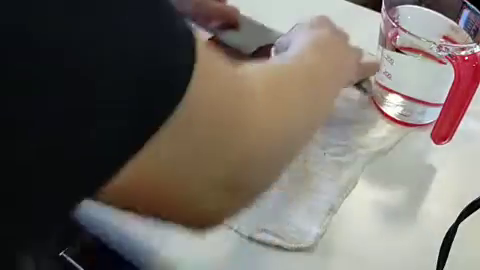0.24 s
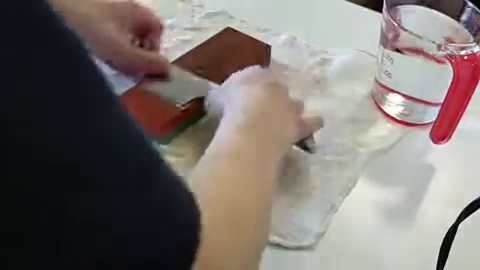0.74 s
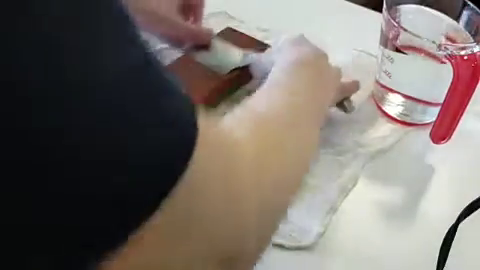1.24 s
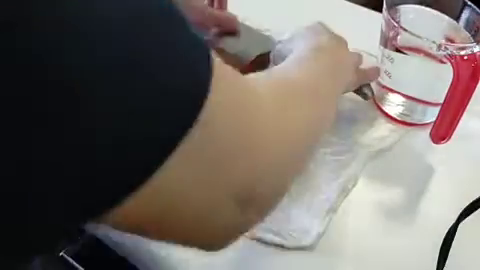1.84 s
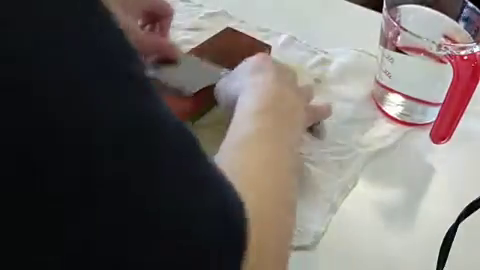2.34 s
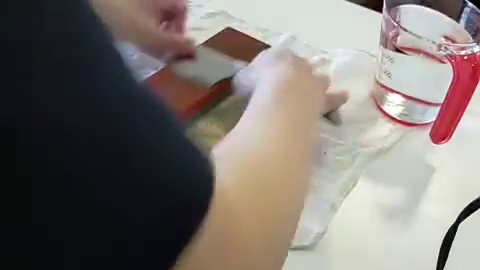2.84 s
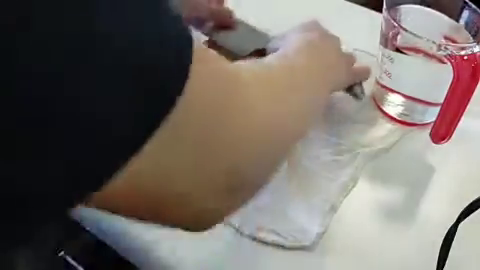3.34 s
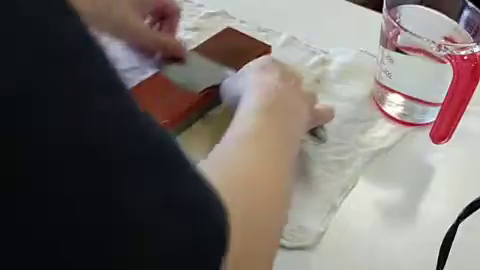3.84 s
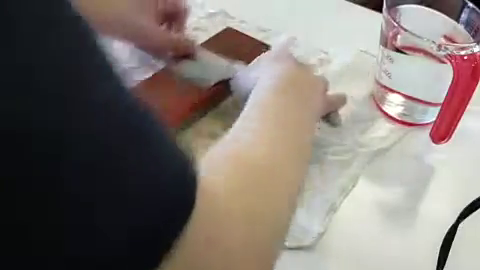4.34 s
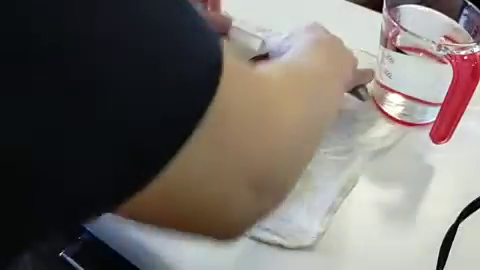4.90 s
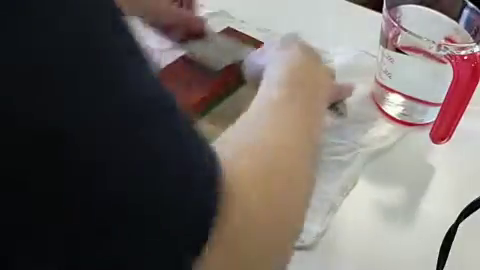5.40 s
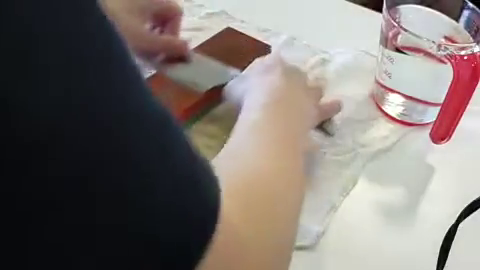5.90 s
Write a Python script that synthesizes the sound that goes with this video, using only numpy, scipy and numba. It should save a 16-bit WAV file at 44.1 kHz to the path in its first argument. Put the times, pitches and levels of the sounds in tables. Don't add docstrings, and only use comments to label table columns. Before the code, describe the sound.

Close, thin-sounding knife sharpening in a small indoor room: a knock of steel on stone, a rough metallic scrape with wavering high ring and sandy hiss, a quick flick, then a brief gap of faint room air. Eight regular strokes follow the end of an earlier one. Most surge towards the lift; the seventh stalls, then jerks onward with a low rumble. A few small clicks stray among them.

```python
import sys
import numpy as np
from scipy import signal
from scipy.fft import rfft, irfft, next_fast_len
from scipy.io import wavfile
from scipy.ndimage import uniform_filter1d
from numba import njit

SR = 44100
rng = np.random.default_rng(int(sys.argv[2]) if len(sys.argv) > 2 else 0)


def wav_record(signal):
    frames = np.transpose(np.atleast_2d(signal))
    bounded = np.clip(frames, -1, 1)
    quanta = np.round(bounded * 32767).astype(np.int16)
    wavfile.write(sys.argv[1], SR, quanta)


def rack_gain(trim_db):
    fader = np.asarray(trim_db, float)
    return 10 ** (fader / 20)


N = 271656

# time in seconds, ring level in dB.
PRESSURES = [
    [(0.405, -48), (0.433, -47), (0.441, -34.5), (0.689, -34.5), (0.787, -23.5), (0.825, -41), (0.832, -48)],
    [(1.15, -55), (1.16, -61), (1.246, -32.5), (1.404, -38.5), (1.414, -32.5), (1.55, -28.5), (1.582, -40)],
    [(1.91, -49.5), (1.996, -25.5), (2.042, -35), (2.046, -32), (2.27, -28.5), (2.356, -27.5), (2.385, -65)],
    [(2.675, -50), (2.697, -52), (2.757, -26.5), (2.895, -25.5), (2.899, -32), (3.075, -22), (3.11, -42)],
    [(3.405, -61), (3.427, -65), (3.503, -28), (3.677, -31.5), (3.701, -24), (3.817, -29), (3.84, -52)],
    [(4.17, -65), (4.194, -59), (4.232, -29.5), (4.336, -29), (4.35, -36.5), (4.568, -25), (4.605, -43)],
    [(4.95, -23), (4.962, -42), (5.02, -29), (5.06, -35.5), (5.188, -40)],
    [(5.69, -44), (5.76, -33), (5.81, -31.5), (5.87, -30.5), (6.03, -31), (6.09, -26.5), (6.108, -35)],
]
# time in seconds, hiss level in dB.
SPEEDS = [
    [(0.405, -44), (0.443, -46), (0.625, -41.5), (0.745, -32.5), (0.759, -41), (0.811, -30.5), (0.832, -58)],
    [(1.15, -55.5), (1.234, -35), (1.258, -41.5), (1.384, -43), (1.426, -32), (1.548, -33), (1.582, -58)],
    [(1.91, -67), (1.958, -35.5), (2.004, -26.5), (2.03, -34.5), (2.172, -39.5), (2.342, -34.5),
     (2.385, -58)],
    [(2.675, -56), (2.699, -50), (2.765, -31), (2.913, -43), (2.935, -33.5), (3.065, -35), (3.11, -45)],
    [(3.405, -75), (3.423, -65), (3.493, -33), (3.619, -41.5), (3.745, -30), (3.809, -39.5), (3.84, -48)],
    [(4.17, -88), (4.222, -39.5), (4.254, -35.5), (4.354, -43.5), (4.53, -32.5), (4.576, -34.5),
     (4.605, -55)],
    [(4.95, -29), (4.958, -46), (5.022, -38.5), (5.084, -45), (5.188, -42.5)],
    [(5.69, -48), (5.716, -53), (5.746, -31.5), (5.77, -31.5), (5.916, -42), (6.036, -37.5), (6.108, -38.5)],
]
# time in seconds, ring level in dB, hiss level in dB.
JERKS = [
    [(0.0, -25.5, -36), (.03, -32.5, -36), (.07, -49, -60)],
    [(5.19, -46, -48), (5.197, -39.5, -36), (5.26, -26.5, -33.5), (5.336, -37, -36), (5.39, -64, -64)],
]
# start in seconds, length in seconds, ring level in dB,
# hiss level in dB, upper mode in Hz.
FLICKS = [
    (0.071, .04, -30.5, -38, 3686),
    (0.833, 0.031, -24.5, -34, 3620),
    (1.582, 0.039, -26.5, -33, 3740),
    (3.111, 0.027, -25, -36.5, 3570),
    (3.843, 0.069, -21, -30.5, 3673),
    (4.609, 0.038, -30, -34, 3670),
    (6.109, 0.048, -38, -45, 3540),
]
# second mode in Hz, third mode in Hz, upper over lower mode while loose in dB,
# time the edge bites in seconds, low mode level in dB.
GRIPS = [
    (1953, 2780, 14, .485, -1),
    (1970, 2800, 8, 1.24, -2),
    (2070, 2910, 8, 1.955, 2),
    (2010, 2850, 8, 2.74, 1.5),
    (1940, 2770, 3, 3.51, 1.5),
    (1975, 2800, 10, 4.25, -.6),
    (1984, 2940, 11, 5.04, -2.5),
    (2220, 2910, 4, 5.725, 4),
]
# time in seconds, upper over lower mode then in dB, the same at the lift in dB,
# upper mode then in Hz, upper mode at the lift in Hz.
BEDDINGS = [
    (.49, -1.5, 13.5, 3560, 3760),
    (1.25, 0, 9.6, 3500, 4000),
    (2.15, 1, 10, 3463, 3735),
    (2.89, -8, 23, 3480, 3600),
    (3.58, 0.5, 14, 3460, 3740),
    (4.3, -4, 18.4, 3530, 3720),
    (5.1, 7, 8, 3610, 3680),
    (5.81, -3, 12, 3450, 3720),
]
# start in seconds, length in seconds, rumble level in dB.
SHOVES = [
    (0.726, .06, -36),
    (1.456, .11, -32),
    (2.258, .04, -46),
    (4.501, 0.04, -44),
    (5.188, .16, -31),
    (6.045, 0.076, -51),
]
# time in seconds, thud level in dB, steel level in dB, bright steel level in dB.
LANDINGS = [
    (0.389, -12.5, -31, -31),
    (1.135, -16.5, -37.5, -45),
    (1.891, -14, -25, -46.5),
    (2.658, -12.5, -27, -31.5),
    (3.389, -17.5, -41, -37.5),
    (4.151, -18.5, -41, -44.5),
    (4.934, -12, -23.5, -30.5),
    (5.672, -12.5, -24.5, -30.5),
]
# time in seconds, peak level in dB, pitch in Hz.
TICKS = [
    (0.7782, -16, 3750),
    (1.8667, -31, 3750),
    (3.447, -37, 4550),
    (4.2136, -33, 3940),
    (4.474, -21, 3760),
    (4.7633, -28.5, 3430),
    (5.1943, -16, 3540),
]
# frequency in Hz, level in dB, T60 in seconds.
BLADE = [(1276, -4, .075), (1972, -2, .055), (2845, -3, .055), (3712, 1, .05), (3982, -8, .05),
         (4570, -5, .07), (5620, -9, .07), (6570, -6, .05), (7200, -1, .015), (8340, -5, .015),
         (9010, -12, .05), (10400, -12, .02)]
# frequency in Hz, level in dB, T60 in seconds.
TABLE = [(143, -1, 0.025), (231, -23, 0.48), (299.4, 14.5, 0.07), (338, -19, 0.27), (569, 4, 0.035),
         (617, -9, 0.028), (856, -34.5, 0.14)]
# frequency in Hz, level in dB per Hz.
HISS = [(2530, -75), (4300, -2), (5270, -11), (5580, 0), (6140, -3.5), (8400, -4), (9370, -7),
        (13700, -16.5), (14700, -24), (15000, -69)]
# frequency in Hz, level in dB per Hz.
AIR = [(15, -50), (25, -15), (154, 0), (202, 0.5), (335, -7), (475, -3), (529, -9), (903, -12), (1030, -14),
       (1670, -19), (2130, -22.5), (2430, -21), (4750, -23.5), (13800, -33.5), (15000, -75)]

FIRST_HZ, SECOND_HZ, THIRD_HZ, FOURTH_HZ = 1276, 1972, 2845, 3712
FIRST_RISE_S, FIRST_TOP_HZ, FIRST_LIFT_HZ = 0.2, 1566, 1450
LOOSE_LEAN_DB, LOOSE_UPPER_HZ, BEDDED_LOWER_HZ, LIFT_LOWER_HZ = 2, 3824, 2974, 3037
BED_IN_S, BITE_TURN_S = 0.055, 0.025
BITE_LOWER_HZ, BITE_SAG = 3025, 2
FLICK_RISE_S, FLICK_FALL_S, FLICK_SWELL_DB_PER_S, FLICK_EDGE_DB, FLICK_LEAN_DB = 0.012, 0.012, 102, 29, 10
LOW_DB, LOW_FOLLOWS, LOW_SAG_DB_PER_S = -40.5, 0.46, 24.5
RUMBLE_DB, RUMBLE_FOLLOWS, SETTLE_DB, SETTLE_S = -47.5, 0.11, 8, 0.066
SHOVE_EDGE_S, SHOVE_SAG_DB = 0.0085, 2.5
ROOM_T60_S, WALL_CUT_HZ, ROOM_DB, AIR_DB = 0.39, 21000, -24.5, -51.5
MIC_LOW_HZ, MIC_HIGH_HZ = 175, 14460


def scrape():
    press_db, hiss_db = effort(PRESSURES, column=2), effort(SPEEDS, column=3)
    upper_db, upper_hz, lower_db, lower_hz, first_hz = strong_modes(press_db)
    loose = np.exp(-(since_latest([row[0] for row in LANDINGS]) / 0.17) ** 2)
    grains = grit(per_s=7400.0, spread_db=2.5, clump_db=1.5)
    upper = cluster(grains, upper_hz, spacing_hz=161.5, width_hz=118, loose=0.86 * loose)
    lower = cluster(grains, lower_hz, spacing_hz=144, width_hz=136, loose=0.75 * loose)
    modes = weak_modes(grains, first_hz)
    broad = moving_mode(grains, np.full(N, 1900.0), width_hz=1000)
    low = rms_one(modes[0] + modes[1]) + rack_gain(7.5 - 14.5 * loose) * broad
    low = signal.sosfilt(signal.butter(4, 1150, "high", fs=SR, output="sos"), low)
    hiss = patchy_hiss(grains) + rack_gain(-11 + 9 * loose) * rms_one(sum(modes[5:]))
    low_db, rumble_gain = low_levels(hiss_db)
    rumble, rocking = stone_and_table()
    steel = rack_gain(upper_db) * upper - rack_gain(lower_db) * lower
    steel = steel + rack_gain(hiss_db + 2.0) * rms_one(hiss) + rack_gain(low_db - 1.0) * rms_one(low)
    return contact() * (steel + rumble_gain * rumble + shove_gain() * rocking)


def grit(per_s, spread_db, clump_db):
    sizes = rack_gain(spread_db * np.minimum(rng.exponential(1, N), 5)) * rng.choice([-1, 1], N)
    hits = rng.random(N) < per_s / SR
    return rms_one(sizes * hits * rack_gain(clump_db * drift(270.0)))


def cluster(grains, hz, spacing_hz, width_hz, loose):
    out = moving_mode(grains, hz, width_hz) * rack_gain(0.65 * drift(12.0))
    for side in (-3, -2, -1, 1, 2, 3):
        near_hz = hz + spacing_hz * (side + 0.35 * drift(1.4))
        near = moving_mode(grains, near_hz, width_hz * 1.07)
        flare = rack_gain(1.5 - 4.5 * abs(side) + 2.4 * drift(39.0))
        out += (1 - loose) * near * (-1) ** side * flare
    return rms_one(out)


def weak_modes(grains, first_hz):
    slide = uniform_filter1d(first_hz, size=1500) / FIRST_HZ
    modes = []
    for hz, level_db, t60_s in BLADE:
        mode_hz = hz * slide ** (FIRST_HZ / hz) ** 0.7
        mode = moving_mode(grains, mode_hz, width_hz=45 + hz * 0.008)
        modes.append(mode * rack_gain(level_db * 0.4 + 3.5 * drift(14.0)))
    return modes


def patchy_hiss(grains):
    bright, edges_hz = coloured(grains, HISS), np.geomspace(3000, 16000, 9)
    hiss = 0
    for k, band_hz in enumerate(zip(edges_hz, edges_hz[1:])):
        band = signal.sosfilt(signal.butter(2, band_hz, "band", fs=SR, output="sos"), bright)
        hiss = hiss + (-1) ** k * band * rack_gain(3.4 * drift(11.0))
    return rms_one(hiss)


def stone_and_table():
    jolts = grit(per_s=500.0, spread_db=1.5, clump_db=-0.5)
    rumble = sum(rms_one(ring(jolts, hz, t60_s * 0.49)) * rack_gain(level_db * 0.42) for hz, level_db, t60_s in TABLE)
    rock = ring(jolts, 282, 0.047) - ring(jolts, 305, 0.055) + rack_gain(-6) * ring(jolts, 883, 0.013)
    rocking = rms_one(rumble) + rack_gain(-4.5) * rms_one(rock)
    return rms_one(rumble), rms_one(rocking)


def effort(curves, column):
    rows = [row for curve in curves for row in curve]
    rows += [(row[0], row[column - 1]) for jerk in JERKS for row in jerk]
    for s, long_s, top_db in np.array(FLICKS)[:, [0, 1, column]]:
        rows += [(s, top_db - FLICK_EDGE_DB), (s + FLICK_RISE_S, top_db - FLICK_SWELL_DB_PER_S * long_s),
                 (s + long_s - FLICK_FALL_S, top_db), (s + long_s, top_db - FLICK_EDGE_DB)]
    level_db = np.interp(np.arange(N) / SR, *np.transpose(sorted(map(tuple, rows))))
    return uniform_filter1d(level_db, size=200)


def strong_modes(press_db):
    t = np.arange(N) / SR
    lean, first = [(0, LOOSE_LEAN_DB)], [(0, FIRST_LIFT_HZ)]
    pose = [(0, LOOSE_UPPER_HZ, LIFT_LOWER_HZ)]   # s, upper Hz, lower Hz
    for push, grip, bedding in zip(PRESSURES, GRIPS, BEDDINGS):
        start, lift = push[0][0], push[-1][0]
        second_hz, third_hz, loose_db, bite, free_db = grip
        bed, bed_db, lift_db, bed_hz, lift_hz = bedding
        lean += [(start, loose_db), (bed - BED_IN_S, loose_db), (bed, bed_db), (lift, lift_db)]
        bite_hz = BITE_LOWER_HZ - BITE_SAG * (third_hz - 2790)
        bitten = bite + BITE_TURN_S
        pose += [(start, LOOSE_UPPER_HZ, third_hz), (bite - BITE_TURN_S, LOOSE_UPPER_HZ, third_hz),
                 (bitten, bed_hz, bite_hz), (max(bed, bitten) + BED_IN_S, bed_hz, BEDDED_LOWER_HZ),
                 (lift, lift_hz, LIFT_LOWER_HZ)]
        first += [(start, FIRST_HZ * second_hz / SECOND_HZ), (start + FIRST_RISE_S, FIRST_TOP_HZ),
                  (lift, FIRST_LIFT_HZ)]
    for s, long_s, ring_db, hiss_db, hz in FLICKS:
        lean += [(s, FLICK_LEAN_DB), (s + long_s, FLICK_LEAN_DB)]
        pose += [(s, hz, LIFT_LOWER_HZ), (s + long_s, hz, LIFT_LOWER_HZ)]
    pose_s, *pitches = np.transpose(sorted(pose))
    upper_hz, lower_hz = [np.interp(t, pose_s, hz) for hz in pitches]
    lean_db = np.interp(t, *np.transpose(sorted(lean)))
    upper_db = press_db - 10 * np.log10(1 + rack_gain(-2 * lean_db))
    lower_db = press_db - 10 * np.log10(1 + rack_gain(2 * lean_db))
    return upper_db, upper_hz, lower_db, lower_hz, np.interp(t, *np.transpose(first))


def low_levels(hiss_db):
    starts = np.array(LANDINGS)[:, 0]
    since = since_latest([-0.37, *starts])
    latest = np.maximum(np.searchsorted(starts, np.arange(N) / SR) - 1, 0)
    free_db = np.array(GRIPS)[latest, 4]
    low_db = LOW_DB + free_db + LOW_FOLLOWS * (hiss_db + 42) - LOW_SAG_DB_PER_S * since
    rumble_db = RUMBLE_DB + RUMBLE_FOLLOWS * (hiss_db + 42.5) + SETTLE_DB * np.exp(-since / SETTLE_S)
    return low_db, rack_gain(rumble_db)


def shove_gain():
    t, gain = np.arange(N) / SR, np.zeros(N)
    for s, long_s, shove_db in SHOVES:
        edge = np.clip(np.minimum(t - s, s + long_s - t) / SHOVE_EDGE_S, 0, 1)
        gain = gain + edge * rack_gain(shove_db - SHOVE_SAG_DB * np.clip((t - s) / long_s, 0, 1))
    return gain


def contact():
    touching = np.zeros(N)
    spans = [(move[0][0], move[-1][0]) for move in JERKS + PRESSURES]
    spans += [(row[0], row[0] + row[1]) for row in FLICKS]
    for start, lift in spans:
        touching[round(start * SR):round(lift * SR)] = 1
    return uniform_filter1d(touching, size=200)


def since_latest(starts):
    since = np.arange(N)[:, None] / SR - np.array(starts)
    return np.where(since > 0, since, 9).min(axis=1)


def moving_mode(x, hz, width_hz):
    return rms_one(glide(x, 2 * np.pi * hz / SR, np.exp(-np.pi * width_hz / SR)))


@njit
def glide(x, turn, r):
    y = np.zeros(len(x))
    for i in range(2, len(x)):
        y[i] = x[i] - x[i - 2] + 2 * r * np.cos(turn[i]) * y[i - 1] - r * r * y[i - 2]
    return y


def landings():
    out, span = np.zeros(N), round(0.25 * SR)
    t = np.arange(span) / SR
    for (s, thud_db, steel_db, bright_db), grip in zip(LANDINGS, GRIPS):
        modes = struck_blade(t, second_hz=grip[0], third_hz=grip[1])
        crunch = ring(rng.standard_normal(span), 8000, 0.0022) * np.exp(-t / 0.0081)
        push = np.sin(np.pi * np.clip(t / 0.00092, 0, 1))
        push = push + rack_gain(-6.5) * rng.standard_normal(span) * np.exp(-t / 0.025)
        thud = sum(ring(push, hz, t60_s * 0.73) * rack_gain(level_db) for hz, level_db, t60_s in TABLE)
        snap = np.diff(np.exp(-t / 0.00017), prepend=0)
        parts = [(thud, thud_db - 0.3), (sum(modes[:6]), steel_db + 5.0),
                 (sum(modes[6:]) + rack_gain(-3.5) * crunch, bright_db + 9.0), (snap, thud_db - 8.0)]
        left = rack_gain(np.clip(-4.5 - 0.99 * (thud_db + 12), -14, 0))
        settle = left + (1 - left) / (1 + np.exp((t - 0.011) / 0.0012))
        hit = settle * sum(rack_gain(level_db) * part / np.max(np.abs(part)) for part, level_db in parts)
        at = round((s + 0.0007) * SR)
        out[at:at + span] += hit[:N - at]
    return out


def struck_blade(t, second_hz, third_hz):
    held = second_hz / SECOND_HZ
    pitches = [FIRST_HZ * held ** 0.8, second_hz, third_hz, FOURTH_HZ * (third_hz / THIRD_HZ) ** 0.6]
    pitches += [row[0] for row in BLADE[4:]]
    rattle = (t == 0) + rack_gain(-9.5) * rng.standard_normal(len(t)) * np.exp(-t / 0.0027)
    modes = []
    for k, (hz, (rest_hz, level_db, t60_s)) in enumerate(zip(pitches, BLADE)):
        gain = (-1) ** k * rack_gain(level_db + 2.5 * rng.standard_normal())
        modes.append(gain * ring(rattle, hz, t60_s * 1.3 * held ** -4))
    return modes


def ring(clicks, hz, t60_s):
    r, w = rack_gain(-60 / (t60_s * SR)), 2 * np.pi * hz / SR
    return signal.lfilter([0, np.sin(w)], [1, -2 * r * np.cos(w), r * r], clicks + 1e-18)


def ticks():
    out, span = np.zeros(N), round(0.03 * SR)
    graze = np.arange(span) == 0
    for s, peak_db, hz in TICKS:
        steel = ring(graze, hz, 0.016) - rack_gain(4) * ring(graze, hz * 0.76, 0.0074)
        click = steel + ring(steel, 290, 0.021) * 0 + 0
        click = steel + ring(graze, 290, 0.021) + rack_gain(-2) * ring(graze, 7000, 0.0015)
        at = round(s * SR)
        out[at:at + span] += rack_gain(peak_db - 8.0) * click / np.max(np.abs(click))
    return out


def room(x):
    size = next_fast_len(N + SR)
    turn = 2 * np.pi * np.arange(size // 2 + 1) / size
    dull = 1 / (1 + 1j * turn * SR / (2 * np.pi * WALL_CUT_HZ)) ** 0.16
    echo = 0
    for k, lag in enumerate(rng.uniform(0.011, 0.037, 10) * SR):
        loop = rack_gain(-60 * lag / SR / ROOM_T60_S) * dull * np.exp(-1j * turn * lag)
        echo = echo + (-1) ** k * loop / (1 - loop)
    return irfft(rfft(x, size) * echo, size)[:N]


def microphone(x):
    x = signal.sosfilt(signal.butter(3, MIC_LOW_HZ, "high", fs=SR, output="sos"), x)
    return signal.sosfilt(signal.cheby2(10, 50, MIC_HIGH_HZ * 1.037, fs=SR, output="sos"), x)


def room_air():
    return rack_gain(AIR_DB) * coloured(rng.standard_normal(N), AIR)


def coloured(x, spectrum):
    hz, level_db = np.transpose(spectrum)
    grid = np.log(np.arange(N // 2 + 1) * SR / N + 1)
    return rms_one(irfft(rfft(x) * rack_gain(np.interp(grid, np.log(hz), level_db)), N))


def drift(rate_hz):
    r = np.exp(-2 * np.pi * rate_hz / SR)
    return rms_one(signal.lfilter([1], [1, -2 * r, r * r], rng.standard_normal(N + 8000))[8000:])


def rms_one(x):
    return x / np.sqrt(np.mean(x ** 2) + 1e-20)


def scene():
    knife = scrape() + landings() + ticks()
    heard = microphone(knife + rack_gain(ROOM_DB) * room(knife))
    return np.tile(heard + room_air(), (2, 1))


def top_cut(x):
    return signal.sosfilt(signal.butter(12, 15560, fs=SR, output="sos"), x)


def record(dry):
    return top_cut(dry)


dry = scene()
out = record(dry)
wav_record(out)
```